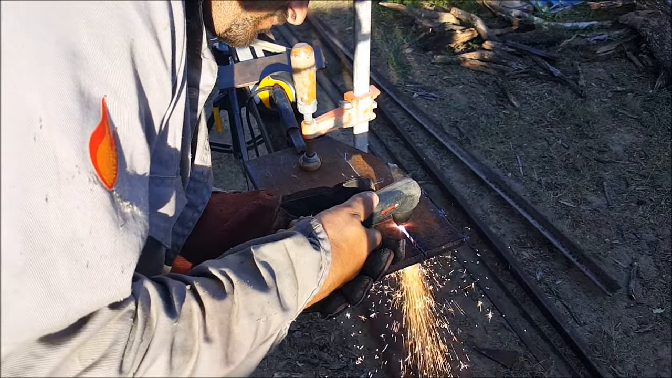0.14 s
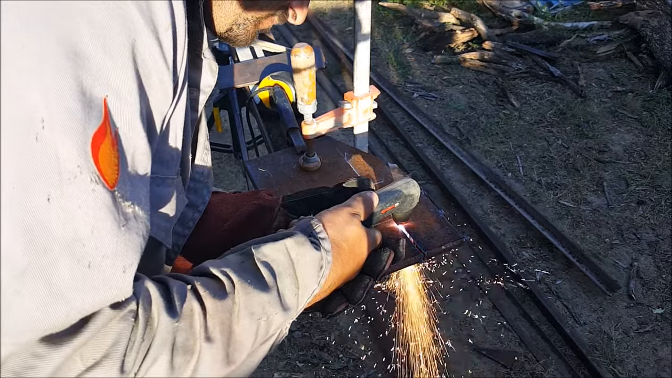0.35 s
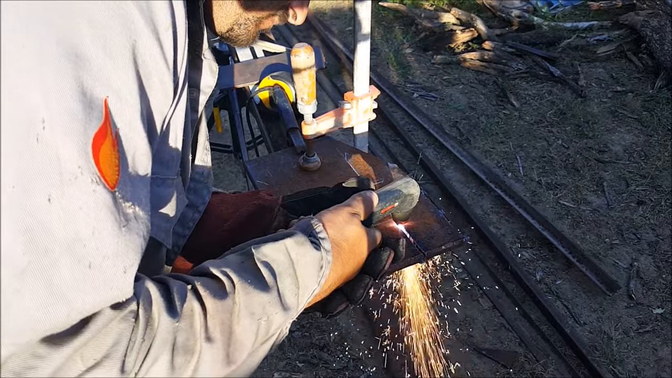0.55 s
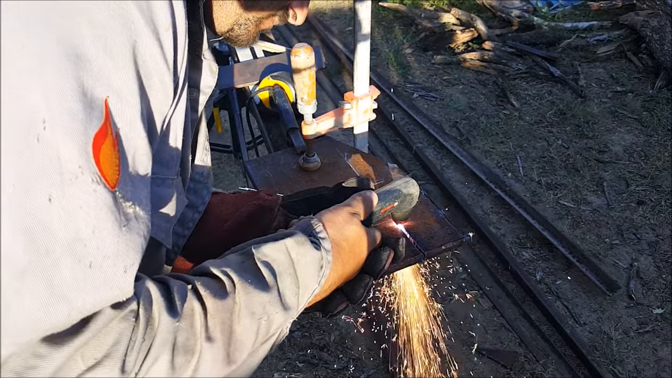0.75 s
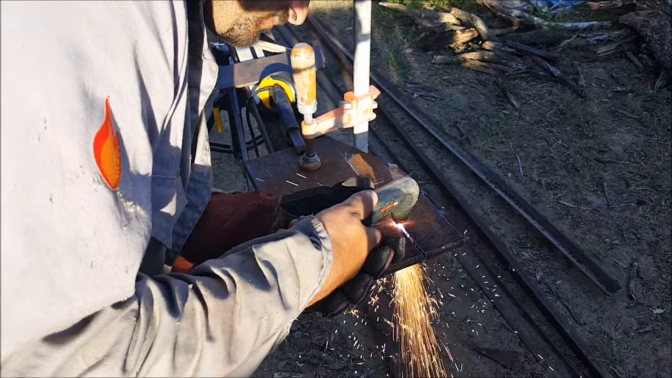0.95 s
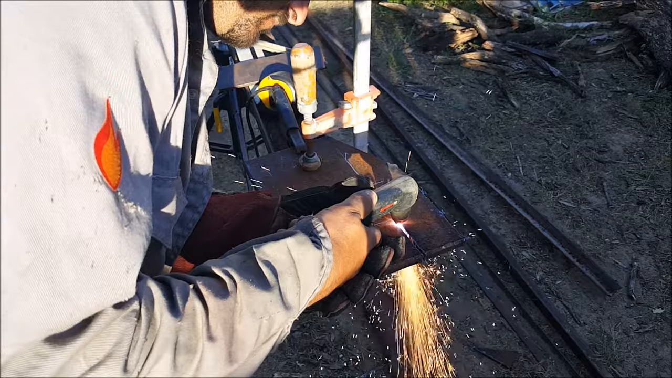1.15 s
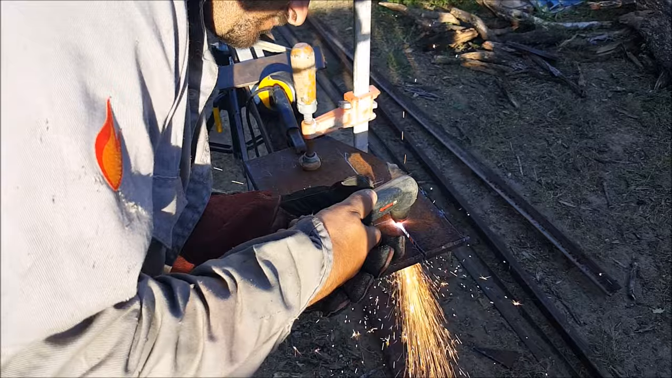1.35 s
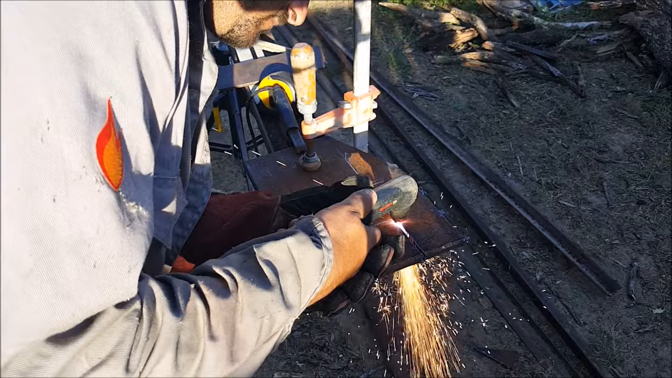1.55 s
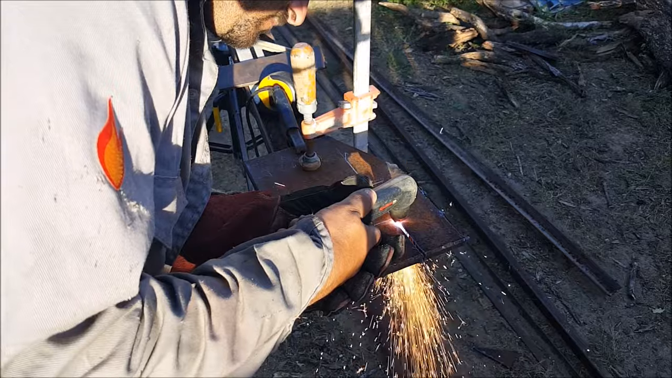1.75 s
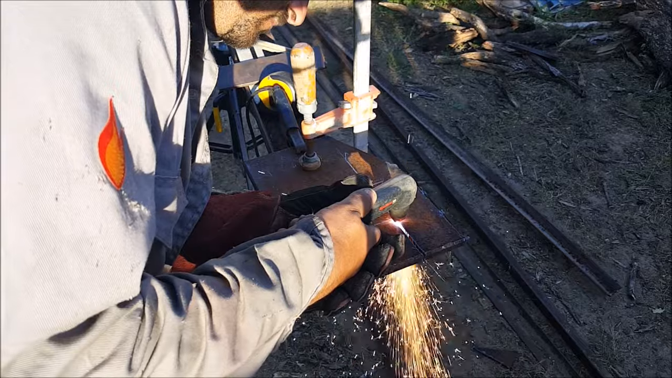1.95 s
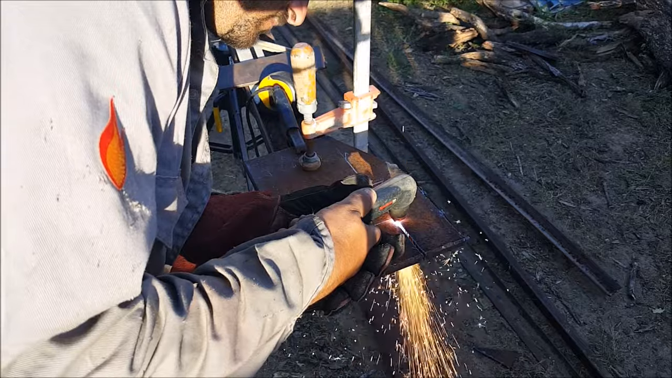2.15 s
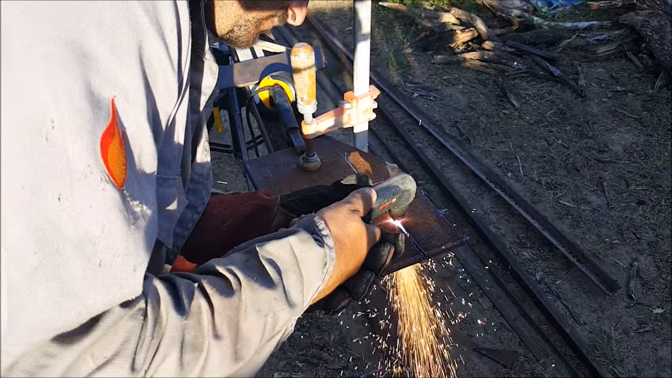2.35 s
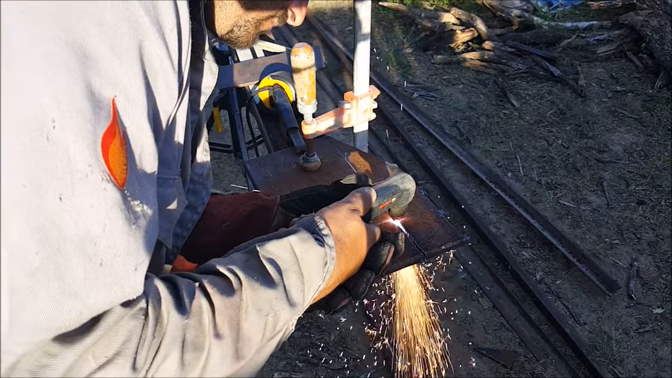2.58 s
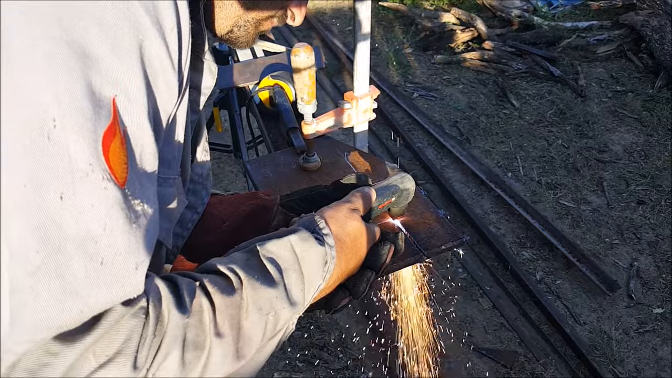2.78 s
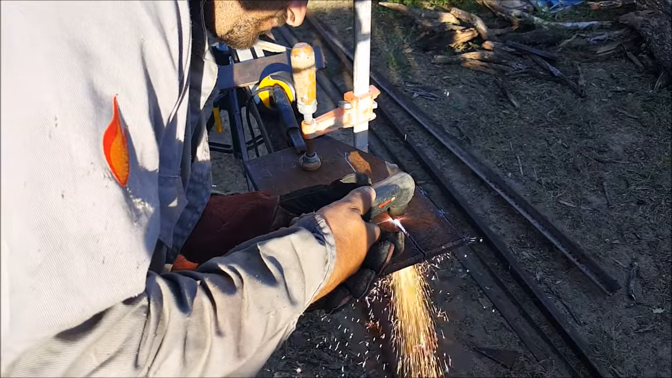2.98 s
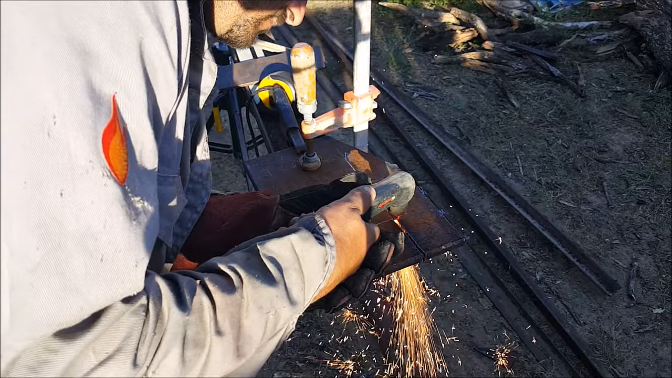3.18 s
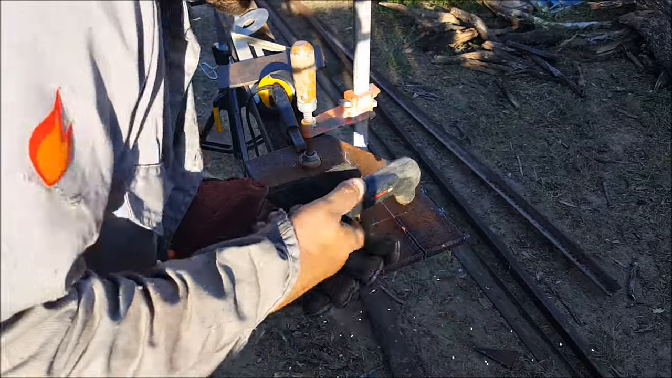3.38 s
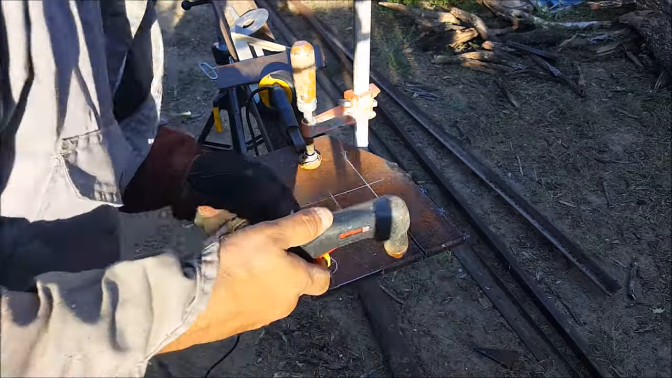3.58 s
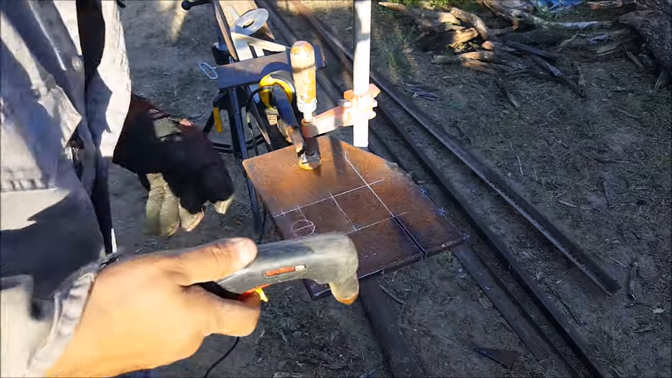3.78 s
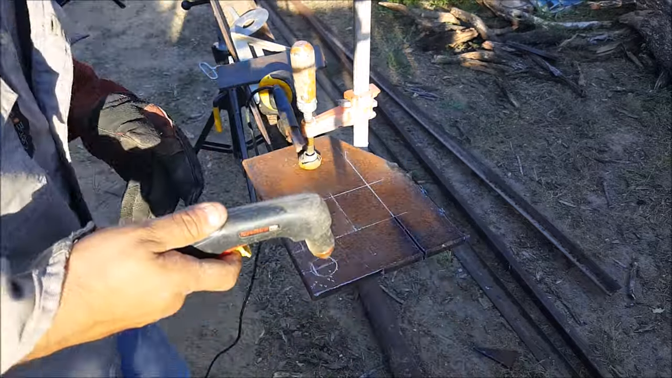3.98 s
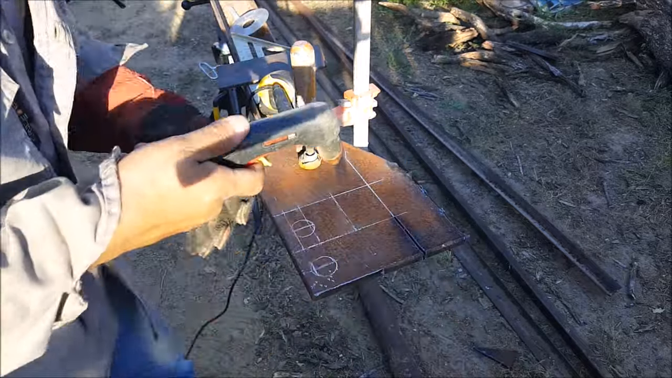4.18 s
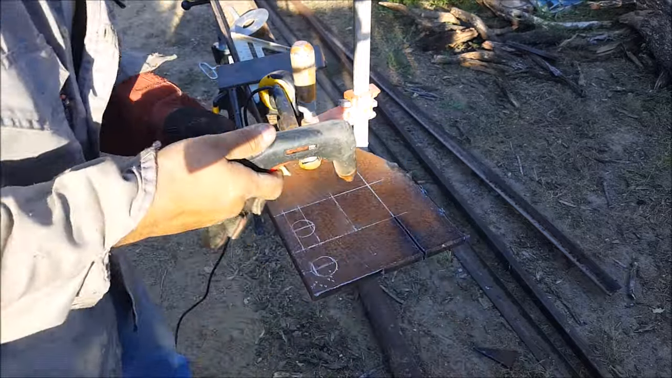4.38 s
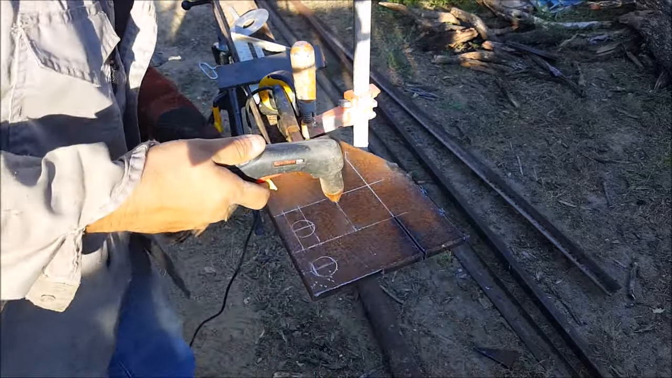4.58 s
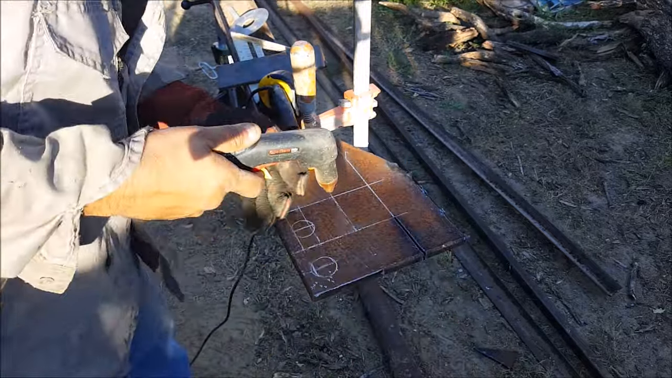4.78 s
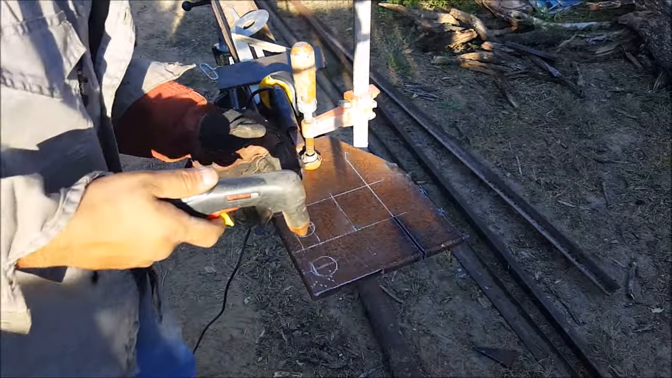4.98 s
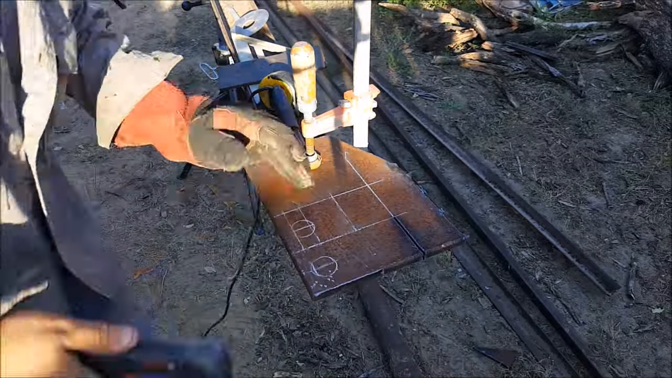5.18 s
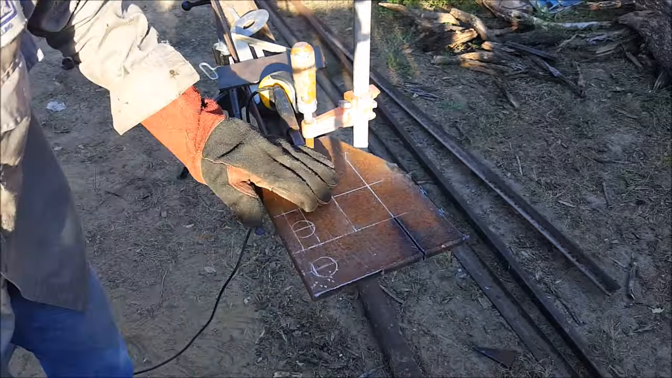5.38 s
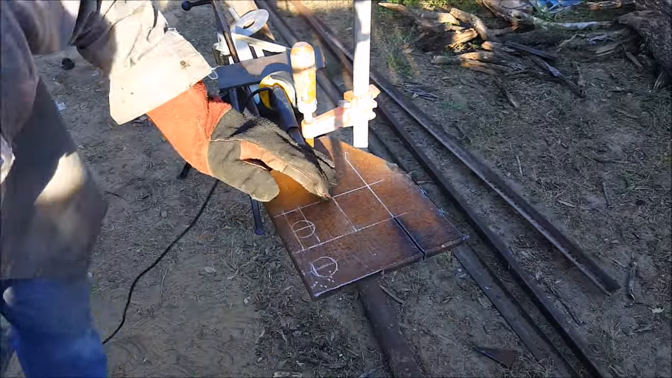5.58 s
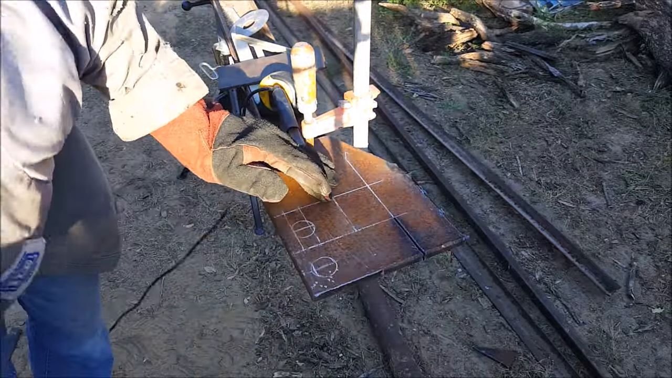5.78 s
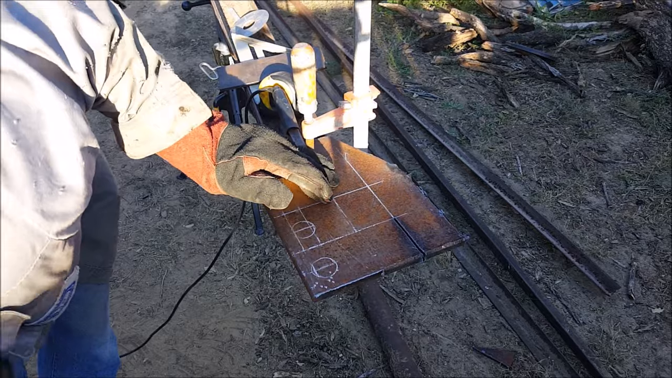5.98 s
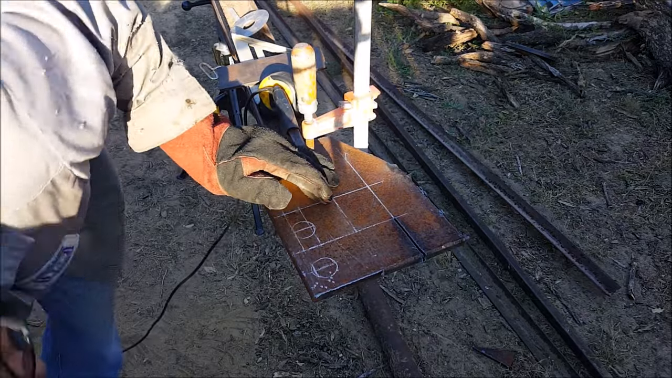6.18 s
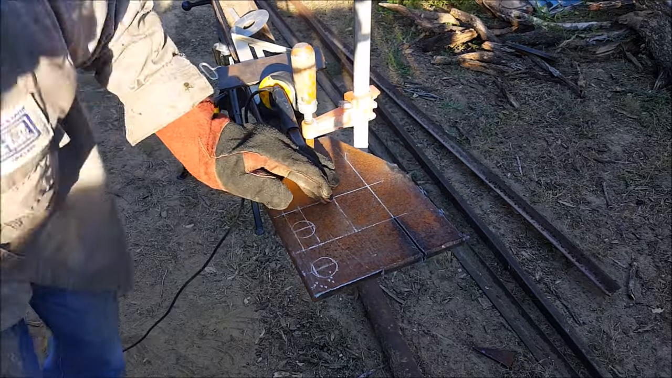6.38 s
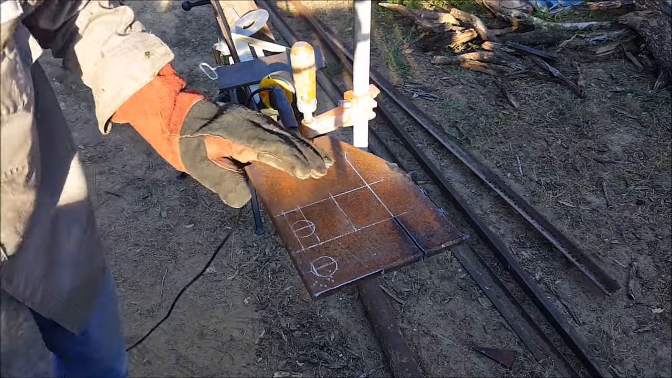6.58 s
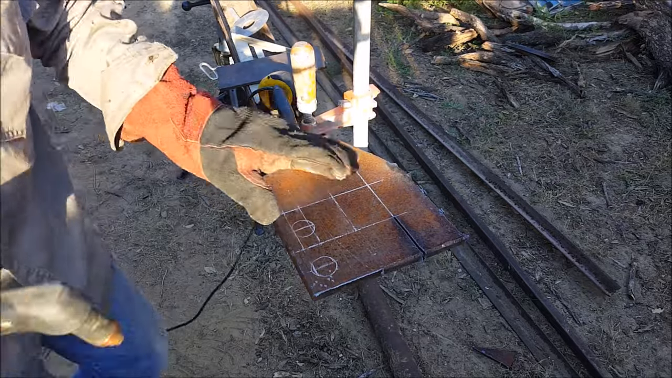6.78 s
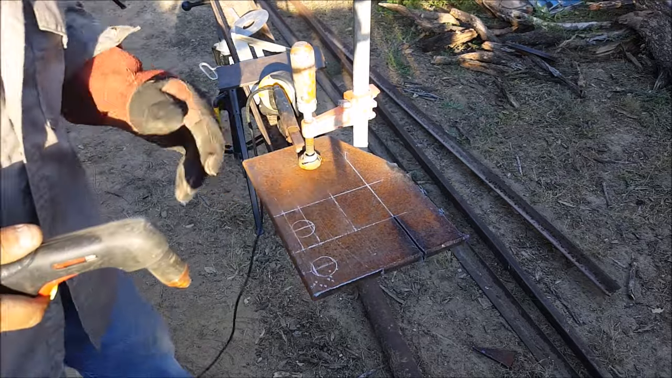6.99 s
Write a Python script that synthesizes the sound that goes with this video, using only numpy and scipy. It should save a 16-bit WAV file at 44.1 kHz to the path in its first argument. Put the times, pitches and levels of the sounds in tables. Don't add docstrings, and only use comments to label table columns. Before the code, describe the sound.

Harsh crackling cutting roar over steady bright air hiss stops abruptly, leaving a moving hiss that fades and returns, with low wind thumps and faint fan whine.

```python
import sys
import numpy as np
from scipy import signal
from scipy.fft import rfft, irfft
from scipy.io import wavfile
from scipy.ndimage import uniform_filter1d, map_coordinates

SR = 44100
rng = np.random.default_rng(int(sys.argv[2]) if len(sys.argv) > 2 else 0)


def volts(x):
    e = np.asarray(x, float) / 20
    return 10 ** e


def transcribe(u):
    v = np.clip(np.atleast_2d(u).T, -1, 1)
    q = np.round(v * 32767).astype(np.int16)
    wavfile.write(sys.argv[1], SR, q)


N = 310464
TIME = np.arange(N) / SR
ARC_OUT_S = 3.294


def unit(x):
    return x / np.sqrt(np.mean(x ** 2, -1, keepdims=True) + 1e-20)


def along(points, hz):
    point_hz, value = np.transpose(points)
    return np.interp(np.log(hz + 1), np.log(point_hz + 1), value)


def curves(rows, t=TIME):
    s, *columns = np.transpose(rows)
    return [np.interp(t, s, column) for column in columns]


def wobble(rate_hz):
    return map_coordinates(rng.standard_normal(4000), [TIME * rate_hz])


def bumps(rows):
    return sum(height * np.exp(-((TIME - s) / length_s) ** 2) for s, height, length_s in rows)


def patches(shape, bins, frames):
    field = uniform_filter1d(rng.standard_normal(shape), size=bins, axis=0)
    field = uniform_filter1d(field, size=frames, axis=1)
    return field / field.std()


def step(hz, edge_hz, octaves):
    return 1 / (1 + (edge_hz / (hz + 1)) ** (4 / octaves))


def coloured(x, spectrum):
    size = 4096
    gain = volts(along(spectrum, np.fft.rfftfreq(size, 1 / SR)))
    cepstrum = irfft(np.log(gain + 1e-6))
    cepstrum[1:size // 2] *= 2
    cepstrum[size // 2 + 1:] = 0
    response = irfft(np.exp(rfft(cepstrum)))
    return signal.fftconvolve(x, response[None], axes=1)[:, :N]


def tilted(x, edge_hz, tilt_db):
    low = signal.sosfilt(signal.butter(3, edge_hz, fs=SR, output="sos"), x)
    high = signal.sosfilt(signal.butter(3, edge_hz, "high", fs=SR, output="sos"), x)
    return unit(low) + volts(tilt_db) * unit(high)


def blend(alike, common, own):
    alike = np.clip(alike, 0, 1)
    return np.sqrt(alike) * common + np.sqrt(1 - alike) * own


def fan():
    rise_db = np.interp(TIME, [3.6, 5.4, 7.04], [-19, 0.5, -1.2])
    level_db = -57 + rise_db + .9 * wobble(9)
    blade_hz = 568 + 1.53 * wobble(16)
    return volts(level_db) * np.sin(2 * np.pi * np.cumsum(blade_hz) / SR)


def wind():
    # frequency in Hz, level in dB.
    buffet = [(15, -38), (35, -2), (98, 5.5), (155, 0.5), (216, -8), (260, -10.5), (340, -32), (570, -120)]
    # time in seconds, level in dB.
    calm = [(3.33, -63), (3.4, -82), (3.52, -63), (3.85, -63), (4.03, -54), (4.6, -51), (5.2, -54),
            (6.4, -52), (6.9, -54.5)]
    # peak in seconds, level in dB, half length in seconds.
    gusts = [(3.66, -58, 0.034), (3.896, -60, .03), (4.027, -43, 0.015), (4.11, -36.5, 0.038),
             (4.26, -44, 0.079), (4.455, -47, .04), (4.55, -45, .03), (4.7, -51, .02), (4.81, -54, 0.022),
             (4.97, -43.5, .06), (5.323, -45, 0.028), (5.5, -48, 0.065), (5.604, -37.5, 0.059),
             (5.74, -51, 0.026), (5.87, -44.5, 0.033), (6.03, -54, 0.035), (6.126, -51, .04),
             (6.293, -56, 0.035), (6.45, -55, 0.05), (6.565, -50, .03), (6.72, -59, .04), (7.04, -56, .03)]
    own_db = 1.6 * np.array([wobble(36), wobble(36)])
    lumps = volts(2.5 * wobble(28) + own_db)
    rumble = unit(lumps * coloured(rng.standard_normal((2, N)), buffet))
    strength = volts(curves(calm)[0]) + bumps([(s, volts(db), length_s) for s, db, length_s in gusts])
    return (TIME > ARC_OUT_S) * strength * volts(2.5) * rumble


def creaks():
    # peak in seconds, frequency in Hz, level in dB, half length in seconds.
    plate_creaks = [
        (3.45, 1580, -50, .03),
        (3.4, 800, -56, .04),
    ]
    total = np.zeros(N)
    for s, hz, db, length_s in plate_creaks:
        total += volts(db) * np.exp(-((TIME - s) / length_s) ** 2) * np.sin(2 * np.pi * hz * TIME)
    return total


def sweep():
    # frequency in Hz, level in dB.
    rush_spectrum = [(130, -44), (240, -7.5), (310, -2), (750, -4.5), (1100, -4), (1500, -8.5),
                     (3000, -30.5)]
    # time in seconds, spill in dB, brightness in dB.
    spill = [(3.33, -67, 11), (3.56, -60.5, 8), (3.72, -72.5, 3.5), (3.95, -69.5, 5), (4.2, -51.5, 1.5),
             (5.1, -47.5, -2), (5.2, -53, 3), (5.9, -63, 2), (6.4, -59.5, 0.5), (7.04, -56.5, 3)]
    # closest in seconds, level in dB, brightness in dB,
    # approach in seconds, retreat in seconds.
    passes = [
        (3.635, -53.5, 10.5, 0.037, 0.023),
        (4.15, -40.5, -1, 0.023, 0.04),
        (5.045, -41, 1, 0.03, 0.065),
        (5.145, -42.5, 9.5, .045, 0.017),
    ]
    pass_loss_db, treble_narrows = 7.5, 1.26
    spill_db, bright_db = curves(spill)
    low_power = volts(2 * spill_db)
    high_power = volts(2 * (spill_db + bright_db))
    for s, db, shine_db, approach_s, retreat_s in passes:
        distance = np.where(TIME < s, (s - TIME) / approach_s, (TIME - s) / retreat_s)
        away_db = pass_loss_db * distance ** 1.4
        low_power = low_power + volts(2 * (db - away_db))
        high_power = high_power + volts(2 * (db + shine_db - treble_narrows * away_db))
    noise = rng.standard_normal((3, N))
    pair = blend(0.65, noise[0], noise[1:])
    tilt_db = 10 * np.log10(high_power / low_power) - 1.0
    rush = tilted(coloured(pair, rush_spectrum), 590, tilt_db)
    return (TIME > ARC_OUT_S) * np.sqrt(low_power) * volts(0.52 * wobble(45) + 2.0) * rush


def torch(t):
    # time in seconds, nearness as hiss in dB, aim at the camera as treble lift in dB.
    hand = [(3.3, -36, 7), (3.4, -39, 3.5), (3.53, -45, 2.5), (3.65, -44, 7.5), (3.82, -45.5, 6.5),
            (3.95, -39.5, 6.5), (4.1, -31.5, 5.5), (4.3, -30.5, 5.5), (4.55, -28.5, 6.5), (4.9, -29.5, 5.5),
            (5.22, -30, 7), (5.4, -33.5, 5.5), (5.6, -36.5, 1), (5.85, -38, 0), (6.33, -37.5, 0.5),
            (6.55, -33.5, 2), (6.8, -29.5, 7), (7.04, -29, 6.5)]
    hiss_db, aim_db = curves(hand, t)
    cutting = t < ARC_OUT_S
    return np.where(cutting, -29, hiss_db), np.where(cutting, 6, aim_db)


def jet_gain_db(hz, t, aside, low, top, air):
    # frequency in Hz, gain in dB.
    hot = [(5000, 4), (6900, 3.5), (8300, -2), (11500, 2), (13700, -1.5), (15500, 3)]
    # centre in seconds, half length in seconds,
    # centre in Hz, half width in Hz, loss in dB.
    glove = [
        (3.6, 0.064, 4500, 1500, 6),
        (4.163, 0.079, 4560, 900, 10),
    ]
    near_db, aim_db = torch(t)
    far_db = np.maximum(-36.5 - near_db, 0)
    top_db = 0.54 - 0.4 * aim_db - 0.39 * far_db
    pan_db = -4.5 - 0.53 * aim_db + 1.3 * aside
    top_pan_db = -6.5 + 8 * aside
    side = np.array([.5, -.5])[:, None, None]
    shade_db = side * ((pan_db + 6.1) * (1 - low - top) + (top_pan_db + 3.9) * top)
    gain_db = (7.0 - aim_db) * low + (top_db + 2.5) * top + shade_db
    gain_db = gain_db + 0.97 * patches((len(hz), len(t)), bins=7, frames=25)
    gain_db = gain_db + along(hot, hz) * (t < ARC_OUT_S)
    gain_db = gain_db - 3.7 * aside * (1 - step(hz, 2400, 0.64))
    for s, length_s, centre_hz, width_hz, loss_db in glove:
        gain_db[1] -= loss_db * np.exp(-((t - s) / length_s) ** 2 - ((hz - centre_hz) / width_hz) ** 2)
    gain_db[0] -= 10 * (1 - aside) * np.exp(-((hz - 5000) / 420) ** 2)
    gain_db[1] += aside * (4.5 * top - 8 * air)
    return gain_db


def jet():
    # time in seconds, lag of the left port in samples.
    bearing_lag = [(0, 1.1), (3.6, 1.1), (3.95, -2.6), (4.3, -1.8), (5.0, -1.9), (5.4, -7), (5.85, -13.8),
                   (6.6, -13.5), (7.04, -9.5)]
    # frequency in Hz, level in dB.
    left_port = [(300, -36), (800, -25), (1400, -14), (2200, -11), (3600, -11), (5000, -10), (5700, -9),
                 (6800, -11.5), (7600, -6.5), (8500, -2.5), (9600, -9), (11500, -12), (12800, -9),
                 (15500, -6.5)]
    right_port = [(300, -37), (800, -26), (1400, -16), (2200, -12), (3600, -9), (5500, -5), (6900, .5),
                  (7500, -4.5), (8300, 1), (10000, -9.5), (11500, -12), (13700, -4), (15500, -4)]
    # frequency in Hz, common share of power from 0 to 1.
    jet_alike = [(300, .75), (2700, .8), (4200, .62), (5000, .4), (6000, .52), (7100, .36), (8400, .7),
                 (11500, .36), (15500, .68)]
    hz, t, z = signal.stft(rng.standard_normal((3, N)), SR, nperseg=512, noverlap=384)
    hz = hz[:, None]
    low, top, air = 1 - step(hz, 3600, .4), step(hz, 10300, .45), step(hz, 13600, .15)
    bearing = curves(bearing_lag, t)[0]
    aside = 1 - np.clip((bearing + 10) / 7, 0, 1)

    lag = bearing * (1 - .35 * low) + .9 * low
    alike = along(jet_alike, hz) * (1 - .45 * air * (t >= ARC_OUT_S))
    alike = alike * (1 - .6 * aside * np.exp(-((hz - 3200) / 1100) ** 2))
    side = np.array([.5, -.5])[:, None, None]
    common = z[0] * np.exp(-2j * np.pi * hz * lag * side / SR)
    pair = blend(alike, common, z[1:]) * volts(jet_gain_db(hz, t, aside, low, top, air))
    hiss = signal.istft(pair, SR, nperseg=512, noverlap=384)[1][:, :N]
    hiss = np.vstack([coloured(hiss[:1], left_port), coloured(hiss[1:], right_port)])

    flutter_db = 0.3 * wobble(34.2) + 0.24 * wobble(5.43)
    level_db = torch(TIME)[0] + (TIME < ARC_OUT_S) * flutter_db + 0.39 * wobble(10)
    return volts(level_db + 13.0) * hiss


def arc():
    # frequency in Hz, level in dB.
    roar = [(15, -74), (25, -37), (121, -14.5), (313, -6), (436, 0.5), (2110, -6.5), (5000, -21),
            (6500, -50), (11000, -120)]
    # centre in seconds, loss in dB, half length in seconds.
    stumbles = [(0.0, 3.5, 0.064), (.56, 5, 0.019), (.85, 0.5, .15), (1.12, 8, 0.023), (1.52, 2.5, 0.019),
                (1.62, 1, 0.017), (2.115, 7.5, 0.031), (2.33, 1.5, 0.018), (2.42, 3, .015), (2.6, 0, .02),
                (2.835, 8.5, 0.016), (2.91, 4, 0.0092), (3.0, 3, 0.015), (3.1, -0.5, 0.025),
                (3.23, 1, 0.015)]
    # centre in seconds, gain in dB, half length in seconds.
    flares = [(.18, 3, 0.047), (.43, 0.5, 0.033), (1.23, 1.5, 0.023), (1.36, 1, 0.027), (1.8, 2.5, .03),
              (1.94, 3.5, 0.039), (2.06, 1.5, 0.018), (2.18, 1, .03), (2.27, 2.5, .02), (2.68, 3.5, 0.048),
              (2.8, 2.2, 0.018)]
    roar_db, pops_per_s = -21, 1800
    lost_db, won_db = bumps(stumbles), bumps(flares)

    struck = rng.random((3, N)) < pops_per_s / SR
    pops = struck * rng.standard_normal((3, N)) * volts(1.96 * rng.exponential(size=(3, N)))
    drive = blend(0.56, unit(pops), rng.standard_normal((3, N)))
    z = signal.stft(blend(.14, drive[0], drive[1:]), nperseg=256)[2]
    z = z * volts(1.8 * patches(z.shape[1:], bins=3, frames=5))
    drive = signal.istft(z, nperseg=256)[1][:, :N]

    body_db = roar_db - 0.35 * lost_db + 0.05 * won_db + .7 * wobble(29.83)
    bite_db = roar_db - lost_db + won_db + 0.37 * wobble(45)
    after_s = np.maximum(TIME - ARC_OUT_S, 0)
    dying_db = np.where(after_s > 0, -15 - 60 * after_s / 0.1, 0)
    level_db = body_db + dying_db + 0.74 * wobble(110) + 2.5
    return volts(level_db) * tilted(coloured(drive, roar), 1005, bite_db - body_db + 0.27)


def scene():
    return fan() + wind() + creaks() + sweep() + jet() + arc()


def band_limit(x):
    return signal.sosfilt(signal.butter(12, 15830, fs=SR, output="sos"), x)


def record(dry):
    hz = np.fft.rfftfreq(N, 1 / SR)
    soft = dry / (1 + np.abs(dry / .9) ** 5) ** (1 / 5)
    mix = irfft(rfft(soft) * step(hz, 32, 0.81) * (hz < 15830), N)
    return band_limit(mix)


dry = scene()
out = record(dry)
transcribe(out)
```